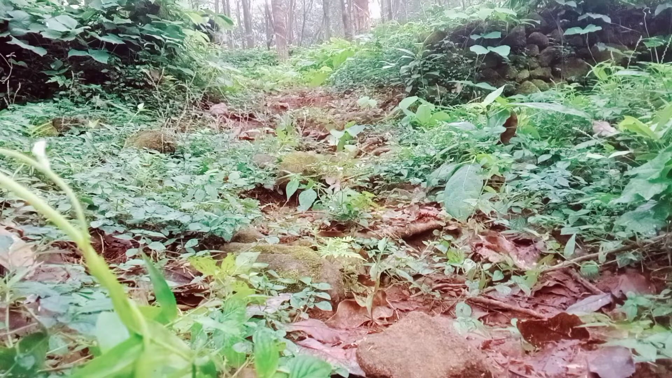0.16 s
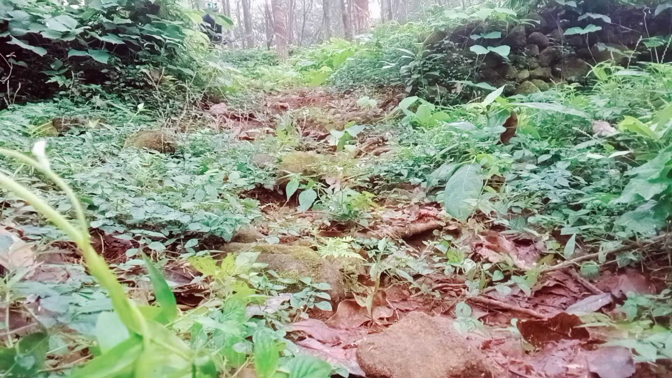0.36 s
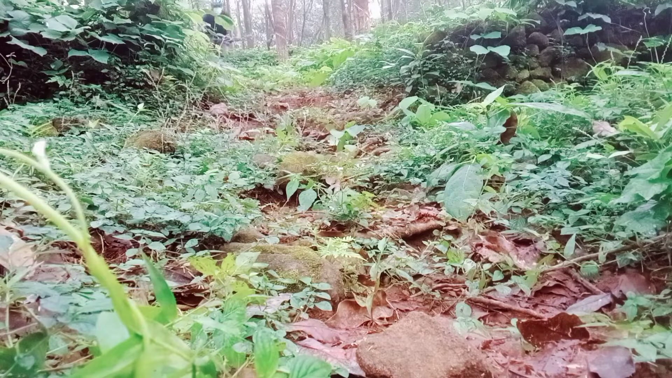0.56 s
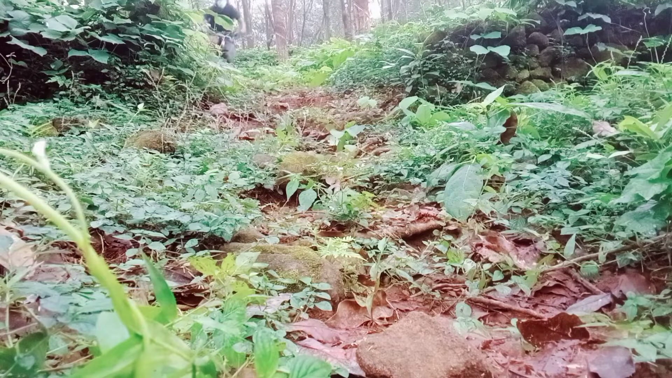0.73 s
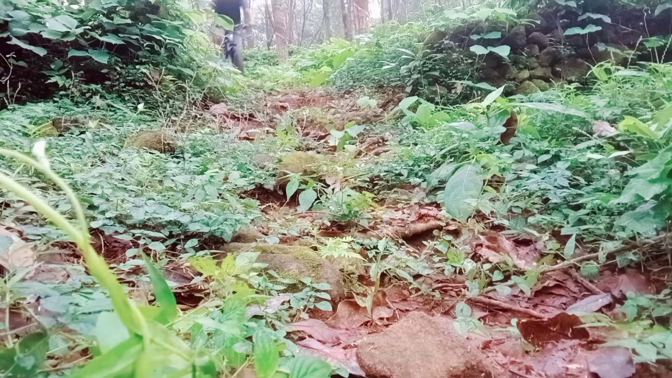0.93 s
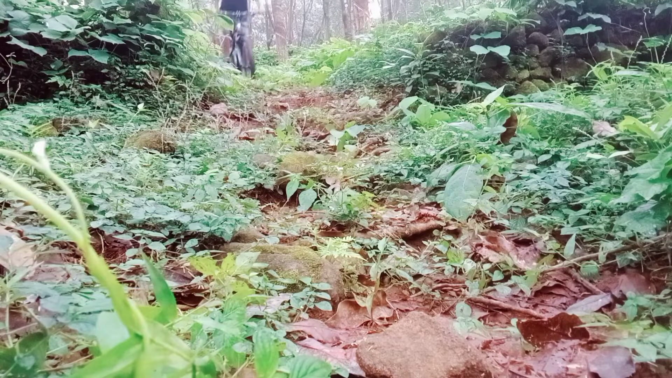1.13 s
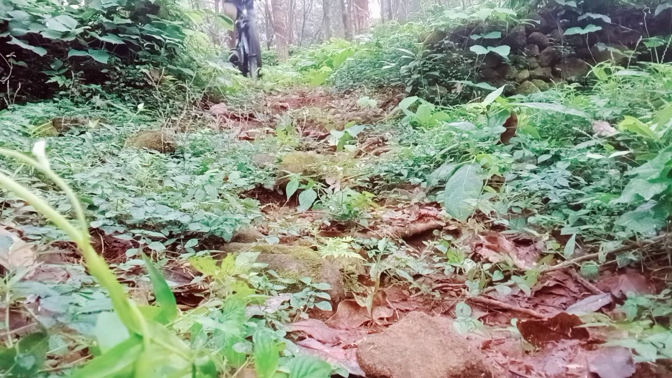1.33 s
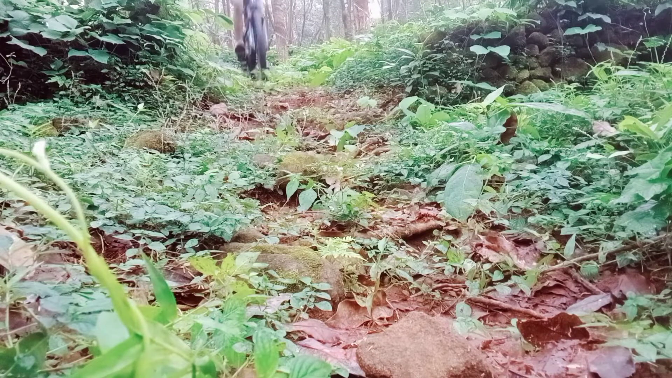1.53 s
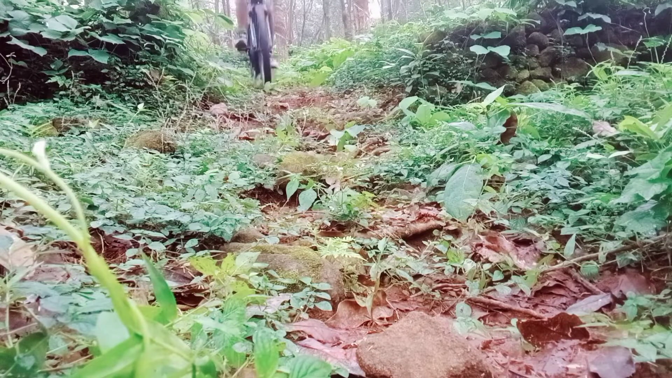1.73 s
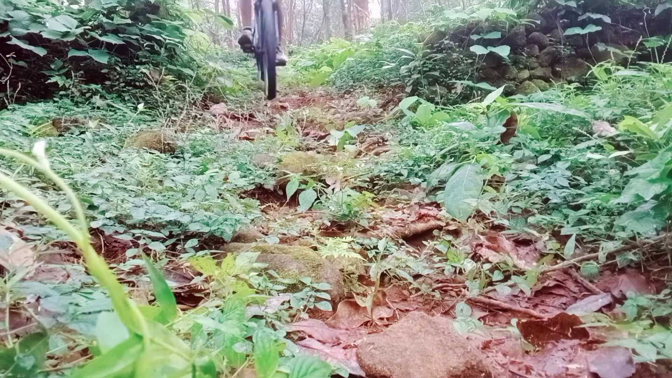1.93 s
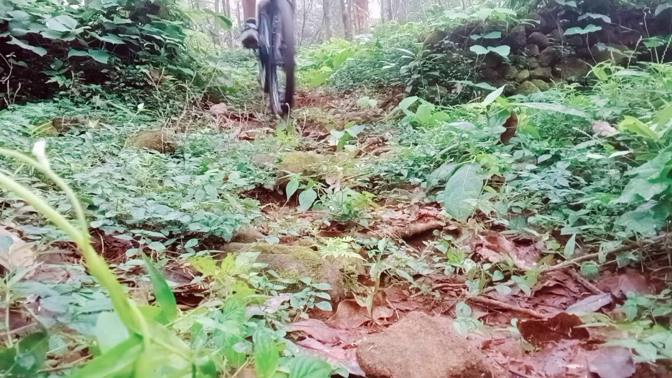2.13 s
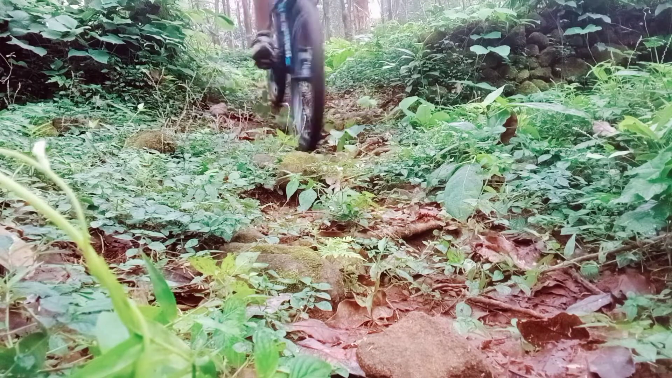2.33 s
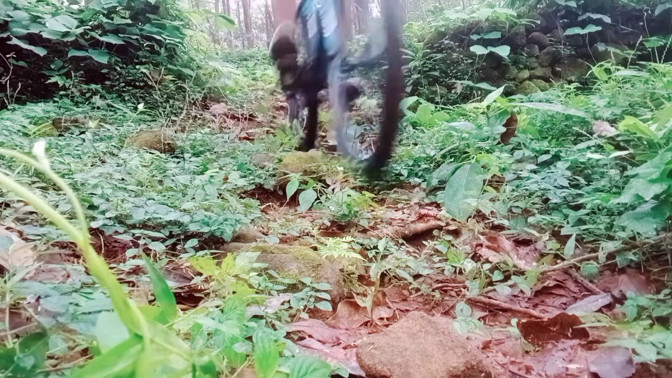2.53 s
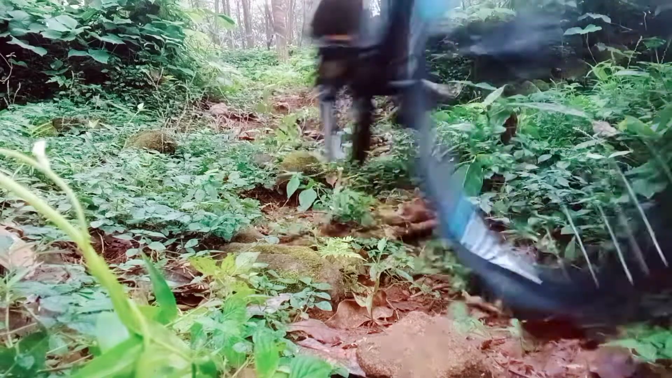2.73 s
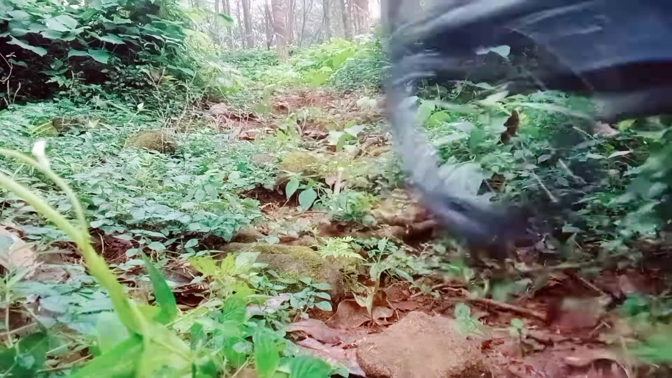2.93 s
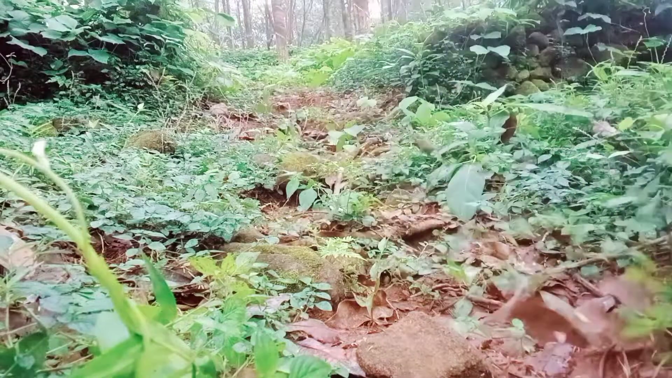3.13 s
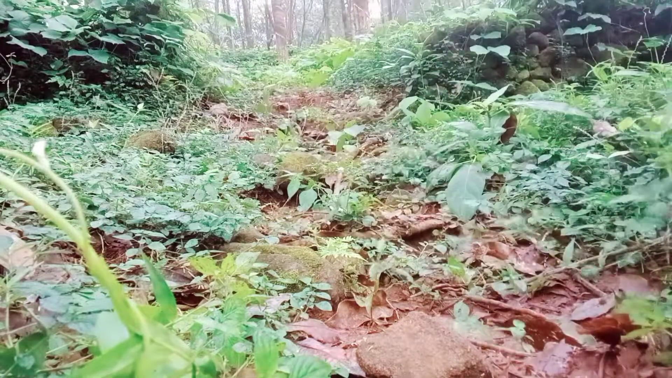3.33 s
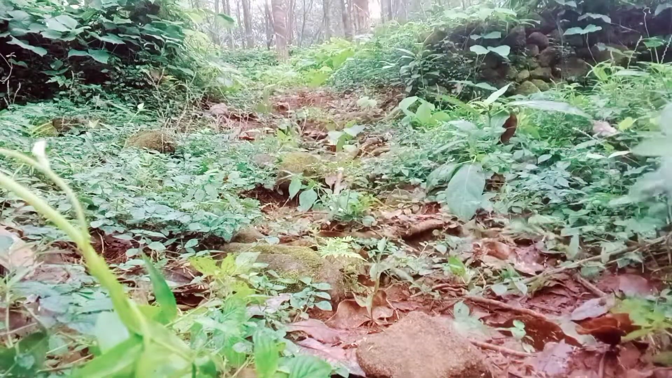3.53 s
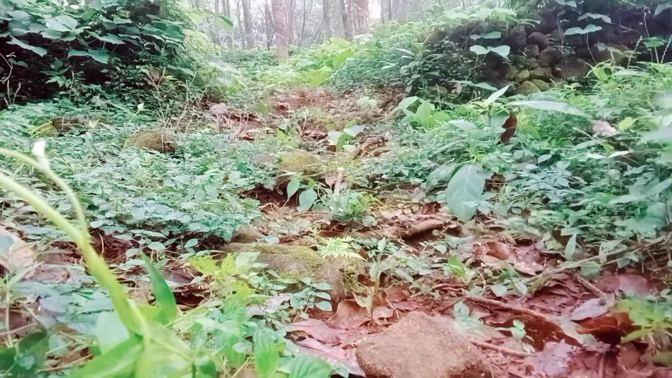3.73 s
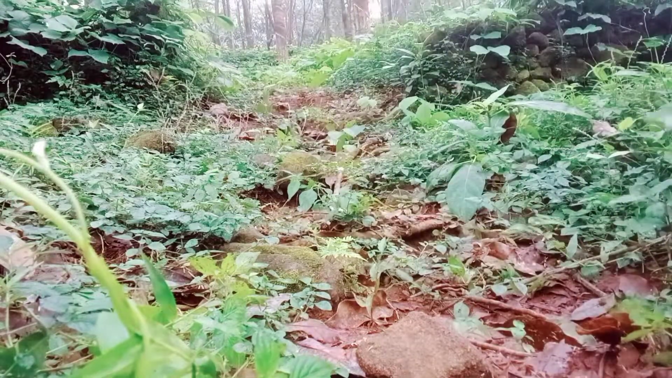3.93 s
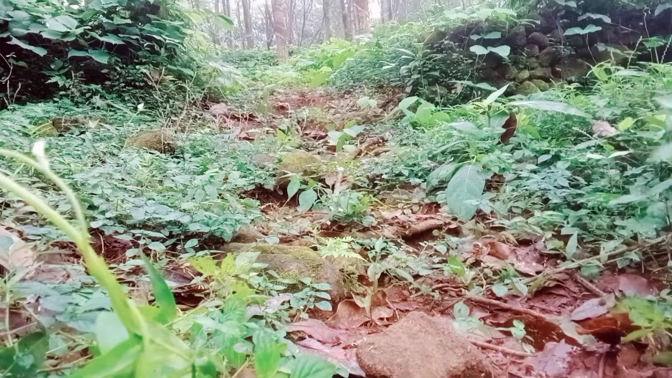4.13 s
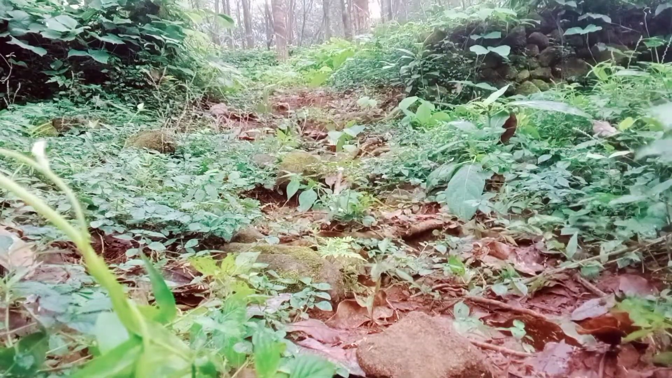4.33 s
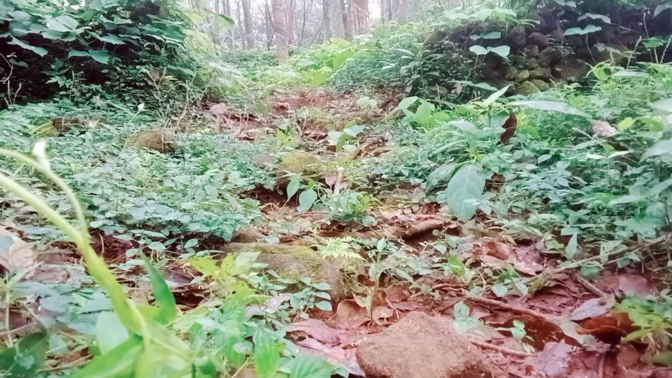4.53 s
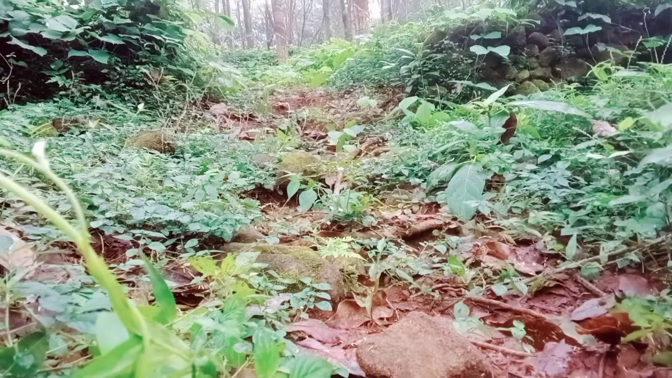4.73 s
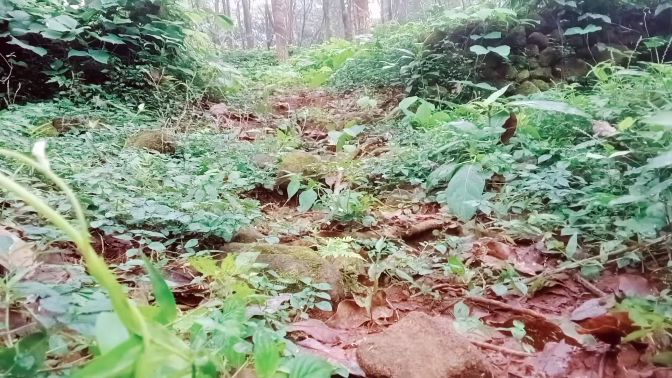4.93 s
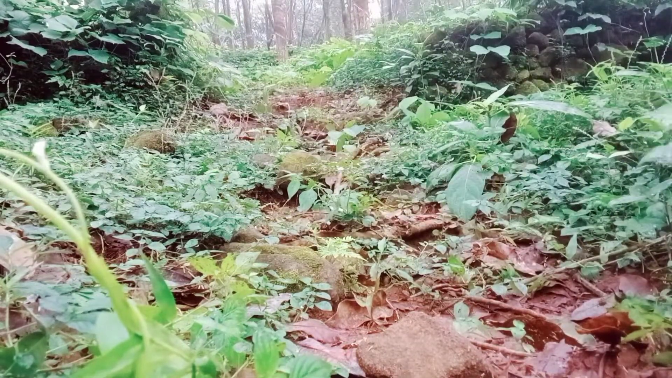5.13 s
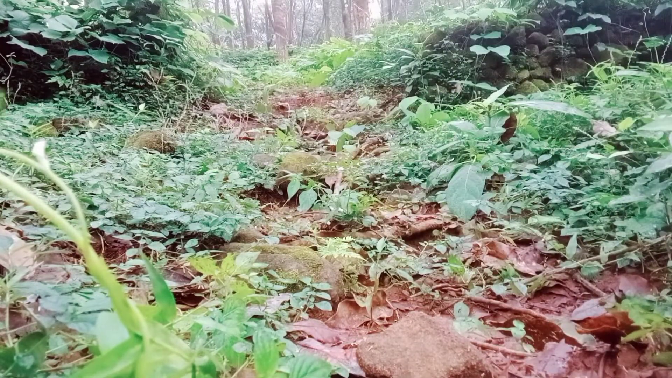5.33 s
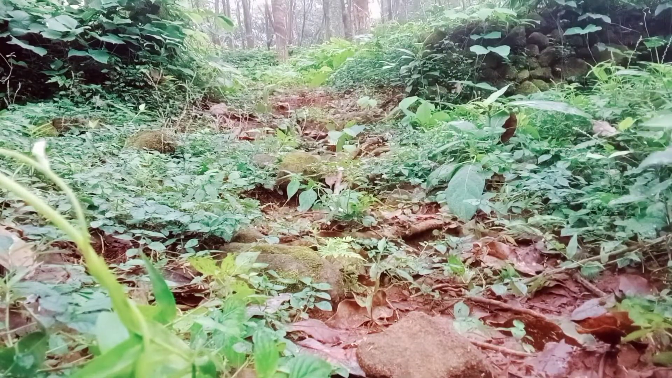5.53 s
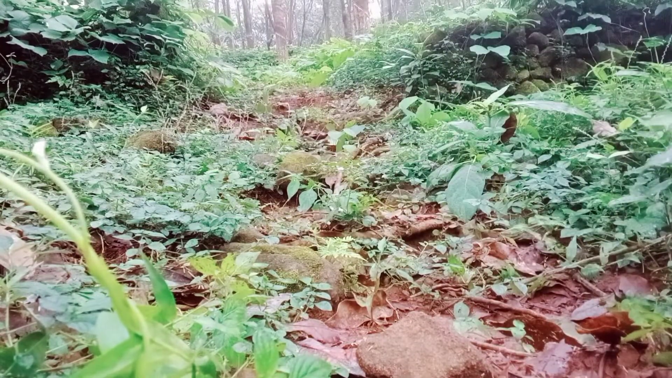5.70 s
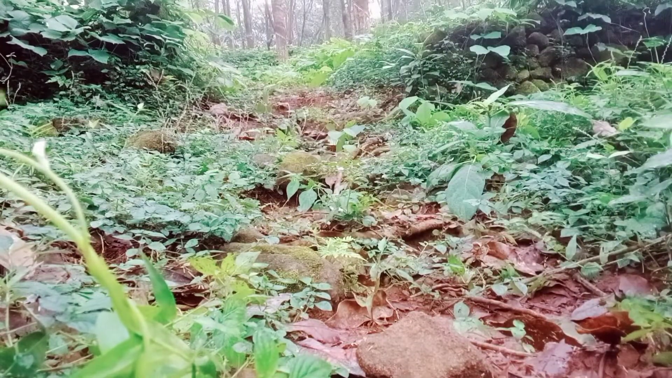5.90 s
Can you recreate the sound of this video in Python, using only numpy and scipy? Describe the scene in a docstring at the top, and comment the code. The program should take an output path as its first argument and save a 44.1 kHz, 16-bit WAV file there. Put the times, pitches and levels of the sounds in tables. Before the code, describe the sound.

Tyres crackle over dry leaves and twigs, swelling to a harsh close pass at about three seconds, then fading into quiet woods.

```python
"""Tyres rumble quietly on a dirt trail, with small bumps and leaf cracks, under the hush of a wood.
The bicycle rolls up, passes and coasts off: coloured noise and tiny breaks follow its level curves.
Roots thump as resonant noise bursts, twigs and leaves snap as ragged ones, hard blows ring as sines.
A small bird's mostly high sine notes linger in noise echoes; late on, a slowing freewheel ticks.
All of it reaches one microphone on the ground, overloaded at the pass."""
import sys
import numpy as np
from scipy import signal
from scipy.fft import rfft, irfft, next_fast_len
from scipy.io import wavfile
from scipy.ndimage import map_coordinates

SR = 44100
rng = np.random.default_rng(int(sys.argv[2]) if len(sys.argv) > 2 else 0)


def gain_from_db(level_db):
    """Turn a decibel level (scalar or array-like) into a linear amplitude factor."""
    decades = np.asarray(level_db, float) / 20
    return 10 ** decades


def put_to_file(sound):
    """Save the sound as 16-bit audio at rate SR, in the file named by the first command-line argument."""
    columns = np.atleast_2d(sound).T  # one column per channel
    safe = np.clip(columns, -1, 1)
    whole_steps = np.round(safe * 32767)
    wavfile.write(sys.argv[1], SR, whole_steps.astype(np.int16))


N = 262783  # samples

# Level curves of the rolling tyres: time_s, soil_level_db, leaf_crush_level_db, treble_fizz_level_db
ROLL_LEVELS = [(0, -57, -64, -76.5), (0.101, -54, -60, -67.5), (.45, -56.5, -59, -63),
               (.6, -53, -56.5, -67.5), (.72, -59.5, -62.5, -70.5), (0.819, -61, -67.5, -84.5),
               (1.0, -55.5, -62.5, -76.5), (1.5, -53, -56, -69.5), (1.85, -42, -49, -62.5),
               (2.06, -43, -49, -64.5), (2.301, -41.5, -46.5, -59), (2.55, -36.5, -43.5, -56.5),
               (2.66, -33.5, -35, -44), (2.77, -29.5, -37.5, -48), (2.84, -29, -27, -35.5),
               (2.92, -31, -29, -38), (3.0, -26.5, -20.5, -34), (3.159, -30.5, -31.5, -39),
               (3.251, -24.5, -22.5, -37), (3.33, -29, -32.5, -43.5), (3.4, -35, -34, -39.5),
               (3.629, -46, -48.5, -57.5), (3.929, -46, -50, -63), (4.12, -52, -56, -65.5),
               (4.3, -52, -54, -61), (4.56, -55, -57, -71), (4.9, -61, -65, -84.5), (5.41, -64, -68, -86.5),
               (5.59, -56, -59.5, -72.5), (5.811, -64, -70, -87), (5.96, -60, -65, -88)]
# Spectrum of the deep ground rumble: freq_hz, relative_level_db (per Hz)
RUMBLE_SPECTRUM = [(15, -53), (25, -25), (64, -1), (108, -2.5), (150, -0.5), (200, -25), (330, -120)]
# Spectrum of the tyre on soil: freq_hz, relative_level_db (per Hz)
DRONE_SPECTRUM = [(71, -37), (120, -7.5), (206, 1.5), (370, -3.5), (470, 0.5), (514, -6), (563, -0.5),
                  (1050, -13), (1300, -30.5), (1690, -45), (2860, -120)]
# Spectrum of crushed leaf litter: freq_hz, relative_level_db (per Hz)
CRUSH_SPECTRUM = [(470, -35.5), (800, -3.5), (897, 0.5), (1490, 1), (1720, 0), (2160, -2), (3380, -4.5),
                  (3670, -4), (5600, -16), (7280, -36.5), (12300, -120)]
# Spectrum of the treble fizz of the litter: freq_hz, relative_level_db (per Hz)
FIZZ_SPECTRUM = [(3120, -35), (5300, -8.5), (5780, -14), (6160, -8.5), (7500, -7), (7960, -3.5),
                 (8840, 0.5), (10700, -12.5), (12700, -12.5), (13200, -15), (14900, -16), (15800, -20)]
RUMBLE_DB, RUMBLE_SWING_DB = -7, 3  # ground rumble re tyre on soil; how far it wavers

# Hush of the wood: freq_hz, relative_level_db (per Hz)
AIR_SPECTRUM = [(24, -42.5), (40, -13), (123, 3), (327, -6.5), (596, -13), (693, -15.5), (3190, -20.5),
                (5260, -31.5), (6110, -23.5), (7650, -37), (8670, -20), (9820, -35), (15800, -43.5)]
AIR_DB = -63
# Bird notes: start_s, peak_db, pitch_hz, linger_db (echoes re note, before a common trim)
BIRD_NOTES = [(.118, -67, 11100, 0), (.243, -54, 11330, -3), (.43, -71, 11400, 3), (.994, -61, 11400, -13),
              (4.558, -43, 11330, -22), (5.059, -45, 11250, -17.5), (5.17, -59.5, 11400, -13),
              (5.325, -35.5, 11330, -31.5), (5.35, -49, 11480, -11), (5.42, -52, 8460, -0.5),
              (1.72, -63, 11350, -8), (5.935, -59, 1820, 0)]
# Steady narrow hums in the wood: pitch_hz, width_hz (of one filter pass), level_db
HUMS = [(330, 72, -63.5), (6200, 210, -86.5)]

# Bumps over roots and clods: crest_s, level_db (before trim), ring_hz, length_ms (sets rise and fall)
BUMPS_HIT = [(0.02, -46, 616, 15), (0.328, -48, 630, 15), (.62, -48.5, 500, 20), (0.98, -47, 300, 14),
             (1.646, -45.5, 360, 7.7), (1.83, -39, 547, 43), (2.0578, -34, 586, 6), (2.245, -34.5, 199, 22),
             (2.311, -34, 407, 16), (4.001, -36.5, 220, 18), (4.185, -48, 430, 22), (4.39, -44.5, 530, 33),
             (5.6, -48, 435, 42), (5.899, -55.5, 400, 54), (0.133, -37, 434, 7.5), (0.2749, -42, 500, 12),
             (0.4008, -36.5, 350, 24.5), (0.5282, -35, 496, 10.4), (1.0564, -46, 646, 38),
             (1.104, -38, 433, 6.9), (1.1755, -39.5, 600, 11), (1.3495, -36.5, 330, 16),
             (1.454, -43.5, 330, 25), (1.526, -39.5, 384, 28), (1.6813, -33.5, 218, 15),
             (1.7358, -37, 374, 16), (1.891, -27, 650, 20.5), (1.957, -30, 455, 14),
             (2.0805, -21.5, 583, 8.5), (2.0869, -21, 500, 4.4), (2.134, -21, 704, 8.7),
             (2.1521, -18, 290, 4.8), (2.2792, -31.5, 336, 12), (2.3566, -26, 490, 12),
             (2.384, -26, 586, 13), (2.4167, -27, 394, 9.6), (2.4318, -27, 490, 15),
             (2.4722, -21.5, 234, 9.2), (2.5051, -23, 567, 9.8), (2.613, -22.5, 447, 13.6),
             (2.6805, -26, 246, 34), (2.7244, -14, 193, 16), (2.8854, -15.5, 430, 8.7),
             (2.953, -11.5, 223, 14.6), (2.9933, -12.5, 930, 11.3), (3.085, -22, 850, 56),
             (3.122, -8, 330, 9.7), (3.1996, -12, 240, 15), (3.243, -18.5, 550, 55), (3.298, -14, 322, 13),
             (3.354, -13.5, 470, 8.4), (3.3987, -23, 456, 13), (3.452, -22.5, 583, 29),
             (3.5503, -27.5, 460, 27), (3.6789, -31.5, 228, 8.7), (3.7131, -34.5, 603, 12),
             (3.7622, -31, 604, 34), (3.8196, -25.5, 566, 21), (3.832, -23.5, 567, 9.9),
             (3.849, -25, 550, 35), (3.8906, -34.5, 484, 20), (4.0039, -26.5, 600, 30),
             (4.0597, -35.5, 492, 29), (4.3029, -35, 626, 21), (4.5111, -43.5, 587, 13),
             (5.497, -44, 808, 12), (5.5286, -32.5, 820, 13.4), (5.5522, -28.5, 330, 16.7)]
BUMP_RISE, BUMP_FALL = .7, .9  # shares of the length
# Hard blows on the tyre: start_s, level_db (before ring levels), lowest_ring_hz
HARD_BLOWS = [(2.8178, -2, 197.2), (5.548, -27.5, 172)]
# Rings of the tyre's air cavity: multiple (of the lowest ring), level_db (re blow), t60_s
TYRE_RINGS = [(1.002, -4.5, .13), (1.95, 5.5, 0.028), (3.1, -14.5, 0.027)]

# Snapping twigs and leaves: crest_s, level_db (before trim), ring_hz, rise_ms (nominal), fizz_db (relative)
TWIG_SNAPS = [(0.0693, -49, 3480, 2.7, -4), (0.1336, -49, 4360, 2.6, -4), (.577, -54, 3370, 8, -6),
              (0.389, -48, 3670, 3, -13), (1.0235, -50.5, 4040, 9.9, -17), (1.063, -46, 4550, 1.5, -18),
              (1.101, -36, 3830, 1.9, -9.5), (1.1752, -39.5, 2120, 2.4, -12.5),
              (1.3443, -39, 1870, 5.4, -18), (1.5345, -38.5, 1910, 6.2, -14.5),
              (1.5744, -38.5, 2170, 6.7, -19), (1.7237, -43.5, 2420, 7, -10),
              (1.7988, -33.5, 2260, 7.1, -14), (1.9524, -37.5, 2280, 14, -15),
              (1.9949, -31.5, 2160, 3.7, -14.5), (2.0488, -36, 1920, 2.4, -24),
              (2.0957, -29.5, 2230, 3.2, -18), (2.128, -33, 2310, 1.8, -16), (1.83, -44, 2310, 9.9, -6),
              (1.9, -43, 1000, 14, -14), (2.0847, -36, 2200, 6.7, -11), (2.15, -38, 2420, 50, -14),
              (0.33, -49, 4600, 3.2, -5), (2.195, -28.5, 2280, 2.8, -11.5),
              (2.2526, -40.5, 2900, 6.8, -4.5), (2.2756, -25, 2630, 6.2, -12.5),
              (2.352, -30, 1530, 3.7, -20), (2.386, -32, 2310, 24, -16), (2.4124, -27, 2370, 3.9, -11),
              (2.4557, -22, 1900, 2.4, -14.5), (2.5058, -24.5, 1490, 10, -14), (2.598, -29, 1700, 3, -17),
              (2.6279, -20.5, 1563, 7.5, -17.5), (2.6759, -17.5, 1624, 4.4, -15),
              (2.7275, -20, 1155, 25, -17.5), (2.8014, -21, 1130, 4.6, -22),
              (2.8115, -16.5, 3673, 2, -20.5), (2.8244, -15.5, 1990, 2, -8.5),
              (2.8421, -18.5, 1570, 31, -11), (2.8843, -12.5, 2307, 18, -11.5),
              (2.946, -15.5, 1226, 1.8, -6), (2.9577, -8.5, 3570, 5.5, -9.5),
              (2.98, -12.5, 2250, 6.8, -2.5), (3.0025, -11, 3566, 12, 0), (3.0331, -5, 1880, 1.8, -12),
              (3.068, -9.5, 3973, 3.6, -11.5), (3.094, -9.5, 2050, 1.5, -11.5),
              (3.1241, -5.5, 1284, 10, -19.5), (3.132, -8.5, 1451, 4.2, -18),
              (3.185, -14.5, 1293, 2.9, -11), (3.2008, -12, 2934, 7.6, -15), (3.218, -12.5, 2830, 12, -17),
              (3.248, -16, 3260, 12, -11), (3.272, -15, 1503, 12, -16.5), (3.3595, -17.5, 1170, 12, -15.5),
              (3.448, -25.5, 1520, 28, -21), (3.555, -30, 1500, 27, -13.5), (3.6918, -46, 2530, 11, -9),
              (3.8311, -37, 1220, 60, -11), (3.9042, -44, 1030, 10, -9), (4.0, -44, 1200, 15, -15),
              (4.056, -33, 1210, 22, -13), (4.304, -38.5, 1150, 11, -16), (4.3578, -45.5, 1630, 3, -8.5),
              (4.4078, -39.5, 3900, 1.9, -3.5), (5.517, -49, 3560, 8.6, 1.5), (5.5276, -35, 3930, 3.8, -24),
              (5.5509, -33.5, 997, 4.5, -18), (5.61, -53, 1486, 72, -18), (4.46, -58, 2500, 45, -7)]
SNAP_FALL_MS, FALL_PER_RISE = 8.3, 0.32  # nominal; a slower crush also dies more slowly
# Clean twig breaks: crest_s, level_db (before trim), ring_hz, rise_ms (nominal), fizz_db (relative)
CLEAN_BREAKS = [(2.928, -2.5, 4600, 1.6, -5.5), (2.654, -13.5, 3510, 4.9, -11.5),
                (3.016, -16, 4000, 2.8, -2), (3.2846, -14, 1520, 3.6, -21), (3.545, -24.5, 2970, 5.9, -18)]
CLEAN_FALL_MS = 2.8  # nominal
SMALL_SNAPS = 70  # count
SMALL_DB, SMALL_SPREAD_DB = 0.5, 3.5  # re leaf litter
SMALL_FIZZ_DB = -15  # mean of their fizz column

# Shudders of the ground: crest_s, level_db, length_ms (9 dB rise and fall time)
GROUND_SHUDDERS = [(1.68, -44, 16), (2.14, -42, 28), (2.4, -54, 22), (2.51, -56, 20), (2.72, -34, 15),
                   (2.81, -34, 23), (2.9, -26, 16), (2.96, -23.5, 40), (3.01, -22, 28), (3.14, -34, 23),
                   (3.32, -22.5, 17), (3.37, -28, 15), (3.68, -46.5, 25), (3.79, -39, 35),
                   (3.93, -37.5, 31), (4.03, -49, 36), (4.25, -46, 80), (4.8, -57.5, 37), (5.15, -48.5, 25)]

# Ring modes of the freewheel pawls: pitch_hz, width_hz (of one filter pass), level_db (re tick)
PAWL_MODES = [(13250, 1100, 0.5), (8410, 1170, 0), (6870, 960, -1), (7000, 9000, -3)]
TICK_COUNT, SLOWS_FROM = 15, 8.5  # ticks; gap index after which the gaps widen
FIRST_TICK_S, TICK_GAP_S, GAP_GROWS_S, TICK_JITTER_S = 4.445, .0478, .0092, .002
TICK_DB, LOUDEST_S, TICK_FADE_DB = -65.5, 4.81, 38  # fade in dB per s squared


def unit(x):
    """Scales x to rms 1."""
    return x / np.sqrt(np.mean(x ** 2) + 1e-20)


def coloured(x, spectrum):
    """Filters x by (Hz, dB) points read on a log axis."""
    m = next_fast_len(len(x) + 2048)
    hz, db = np.transpose(spectrum)
    freqs = np.fft.rfftfreq(m, 1 / SR)
    gain = gain_from_db(np.interp(np.log(freqs + 1), np.log(hz + 1), db))
    return irfft(rfft(x, m) * gain, m)[:len(x)]


def wobble(rate):
    """Draws a smooth random curve, rate knots a second."""
    knots = rng.standard_normal(int(N * rate / SR) + 4)
    return map_coordinates(knots, [np.arange(N) * rate / SR])


def fade(t, rise, t60):
    """Quick rise, exponential fall, top 1; both times in s."""
    shape = (1 - np.exp(-t / rise)) * gain_from_db(-60 * t / t60)
    return shape / shape.max()


def swell(t, rise_ms, fall_ms):
    """Top 1 at t = 0; an abrupt rise gains 9 dB in rise_ms, an ever faster fall loses 9 dB in fall_ms."""
    rise = (1000 * t / rise_ms) ** 2
    fall = (1000 * np.abs(t) / fall_ms) ** 1.25
    return gain_from_db(-9 * np.where(t < 0, rise, fall))


def resonate(x, hz, width_hz):
    """Passes x twice through a resonance for steep skirts; the energy of x is kept."""
    b, a = signal.iirpeak(hz, hz / width_hz, SR)
    ringing = signal.lfilter(b, a, signal.lfilter(b, a, x))
    return unit(ringing) * np.sqrt(np.mean(x ** 2))


def add(track, s, sound):
    """Mixes a sound in at time s."""
    start = round(s * SR)
    part = track[max(start, 0):][:len(sound) + min(start, 0)]
    part += sound[max(-start, 0):][:len(part)]


def roll_levels():
    """Tyre, leaf and fizz levels in dB, one value per sample."""
    s, *levels = np.transpose(ROLL_LEVELS)
    return [np.interp(np.arange(N) / SR, s, db) for db in levels]


def crackle(spectrum, level_db, share, clump_db):
    """Noise and tiny uneven breaks in clumps; the louder (nearer) the tyre, the more they stand apart."""
    near = np.clip((level_db - level_db.min()) / 30, 0, 1)
    happens = rng.random(N) < .02  # chance of a break at each sample
    size = gain_from_db(2.5 * np.minimum(rng.exponential(size=N), 5)) * happens
    breaks = unit(size * rng.standard_normal(N))
    share = np.clip(share, 0, 1) * near
    mix = np.sqrt(1 - share) * rng.standard_normal(N) + np.sqrt(share) * breaks
    clumps = gain_from_db(clump_db * near * (wobble(30) + wobble(90)))
    return gain_from_db(level_db) * unit(coloured(mix * clumps, spectrum))


def rolling():
    """Both tyres press steadily on soil and leaf litter: rumble, drone, crush and fizz."""
    drone_db, crush_db, fizz_db = roll_levels()
    rumble_db = drone_db + RUMBLE_DB + RUMBLE_SWING_DB * wobble(12)
    rumble = crackle(RUMBLE_SPECTRUM, rumble_db, share=0.13, clump_db=-0.3)
    drone = crackle(DRONE_SPECTRUM, drone_db, share=0.21, clump_db=2.5)
    crush = crackle(CRUSH_SPECTRUM, crush_db, share=0.57, clump_db=2.3)
    fizz = crackle(FIZZ_SPECTRUM, fizz_db, share=0.56, clump_db=-0.86)
    return rumble + drone + crush + fizz


def wood():
    """Bird notes, smeared by echoes from the trunks, over a hush and faint narrow hums."""
    hush = unit(coloured(rng.standard_normal(N), AIR_SPECTRUM))
    out = gain_from_db(AIR_DB + 0.93 * wobble(0.89)) * hush
    t = np.arange(-SR // 20, SR) / SR
    for s, db, hz, linger_db in BIRD_NOTES:
        note = np.sin(2 * np.pi * hz * t) * swell(t, 10.4, 9.9)
        echo_shape = fade(np.maximum(t + 0.0092, 0), 0.018, 0.68)
        echoes = resonate(rng.standard_normal(len(t)), hz, 200) * echo_shape
        # the note crests 10 ms after its start
        add(out, s + 0.01 + t[0], gain_from_db(db) * (note + gain_from_db(linger_db - 6.5) * echoes))
    for hz, width_hz, db in HUMS:
        out += gain_from_db(db) * resonate(rng.standard_normal(N), hz, width_hz)
    return out


def bumps():
    """Roots and clods shake the tyre in short broad rumbles; hard blows ring its air cavity."""
    out = np.zeros(N)
    t = np.arange(-SR // 10, SR // 5) / SR
    for s, db, hz, length_ms in BUMPS_HIT:
        shake = rng.standard_normal((2, len(t)))
        shape = swell(t, BUMP_RISE * length_ms, BUMP_FALL * length_ms)
        size = np.sqrt(np.mean(shape ** 2))
        body = 0.67 * resonate(unit(shake[0] * shape), hz, .45 * hz) * size
        rumble = 0.57 * shape * unit(coloured(shake[1], DRONE_SPECTRUM))
        add(out, s + t[0], gain_from_db(db - 0.48) * (body + rumble))
    t = t[t >= 0]
    for s, db, hz in HARD_BLOWS:
        for multiple, ring_db, t60 in TYRE_RINGS:
            ring = np.sin(2 * np.pi * multiple * hz * t) * fade(t, 0.00018, t60)
            add(out, s, -gain_from_db(db + ring_db) * ring)
    return out


def small_snaps():
    """Lesser breaks at chance times, levelled around the crush of the litter; columns as the snaps."""
    u = rng.random((SMALL_SNAPS, 2))
    g = rng.standard_normal((SMALL_SNAPS, 3))
    crush_db = roll_levels()[1][(u[:, 0] * N).astype(int)]
    db = crush_db + SMALL_DB + SMALL_SPREAD_DB * g[:, 0]
    ring_hz = 1200 + 2800 * u[:, 1]
    rise_ms = 4 * gain_from_db(5 * g[:, 1])
    fizz_db = SMALL_FIZZ_DB + 4 * g[:, 2]
    return np.transpose([u[:, 0] * N / SR, db, ring_hz, rise_ms, fizz_db])


def snaps():
    """Twigs and brittle leaves give way with a crack, then splinter in a ragged burst that leaves two rings."""
    out = np.zeros(N)
    t = np.arange(-SR // 12, SR // 8) / SR
    rows = [(*row, SNAP_FALL_MS + FALL_PER_RISE * row[3]) for row in [*TWIG_SNAPS, *small_snaps()]]
    rows += [(*row, CLEAN_FALL_MS) for row in CLEAN_BREAKS]
    for s, db, hz, rise_ms, fizz_db, fall_ms in rows:
        # a new random splinter level every 30 samples
        splinters = gain_from_db(3.3 * np.repeat(rng.standard_normal(len(t) // 30 + 1), 30)[:len(t)])
        ragged = rng.standard_normal((4, len(t))) * splinters
        crack = 0.28 * swell(t + rise_ms / 1600, .5, 3.3)  # ahead of the crest
        shape = swell(t, 0.87 * rise_ms, 1.1 * fall_ms) + crack
        size = np.sqrt(np.mean(shape ** 2))
        ring = 0.51 * size * resonate(unit(ragged[0] * shape), hz, 0.18 * hz)
        ring += 0.32 * size * resonate(unit(ragged[3] * shape), rng.uniform(1500, 4070), 450)
        crunch = 0.53 * shape * unit(coloured(ragged[1], CRUSH_SPECTRUM))
        top_db = rng.normal(-1.5, 3.5)  # the very top of each fizz is brighter or duller by chance
        fizz = unit(coloured(ragged[2], FIZZ_SPECTRUM))
        fizz = coloured(fizz, [(9500, 0.0021), (11500, top_db)])
        fizz *= gain_from_db(fizz_db) * (swell(t, 0.93 * rise_ms, 0.52 * fall_ms) + .3 * crack)
        add(out, s + t[0], gain_from_db(db - 0.78) * (ring + crunch + fizz))
    return out


def trunks(x):
    """Trunks and banks give a short diffuse answer: x convolved with fading noise."""
    t = np.arange(SR // 2) / SR
    tail = rng.standard_normal(len(t)) * fade(t, 0.0033, 0.076)
    return signal.fftconvolve(x, tail / np.linalg.norm(tail))[:N]


def shudders():
    """Deep rumble swells as the weight of the bike drops into hollows."""
    t = np.arange(N) / SR
    gain = sum(gain_from_db(db) * swell(t - s, length_ms, length_ms) for s, db, length_ms in GROUND_SHUDDERS)
    return gain * unit(coloured(rng.standard_normal(N), RUMBLE_SPECTRUM))


def freewheel():
    """The pawls click over the ratchet, further apart as the wheel slows."""
    out = np.zeros(N)
    t = np.arange(SR // 20) / SR
    gaps = TICK_GAP_S + GAP_GROWS_S * np.maximum(np.arange(TICK_COUNT) - 1 - SLOWS_FROM, 0)
    times = FIRST_TICK_S + np.cumsum(gaps) - gaps[0]
    for s in times + TICK_JITTER_S * rng.standard_normal(TICK_COUNT):
        db = TICK_DB - TICK_FADE_DB * (s - LOUDEST_S) ** 2
        for hz, width_hz, mode_db in PAWL_MODES:
            ring = resonate(rng.standard_normal(len(t)), hz, width_hz)
            level = gain_from_db(db + mode_db + rng.normal(0, 3))
            add(out, s, level * ring * fade(t, 0.00078, 0.028))
    return out


def scene():
    """All sources reach one microphone, copied to both channels."""
    hits = bumps() + snaps() + freewheel()
    answer = gain_from_db(-10.5) * trunks(hits)
    mix = hits + answer + rolling() + shudders() + wood()
    return np.tile(mix, (2, 1))


def band_limit(x):
    """A steep low-pass at the top of the band."""
    return signal.sosfilt(signal.butter(12, 16490, fs=SR, output="sos"), x)


def record(dry):
    """The microphone passes neither deep bass nor the top; its input overloads at the loudest breaks."""
    low_cut = signal.butter(3, 48, btype="high", fs=SR, output="sos")
    top_cut = signal.butter(24, 15800, fs=SR, output="sos")
    heard = signal.sosfilt(low_cut, dry)
    heard = signal.sosfiltfilt(top_cut, heard)
    overloaded = heard / (1 + np.abs(heard / .98) ** 8) ** (1 / 8)  # levels off near .98
    return band_limit(overloaded)


dry = scene()
out = record(dry)
put_to_file(out)
```